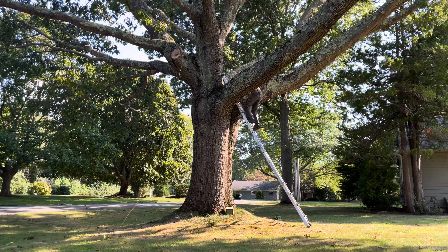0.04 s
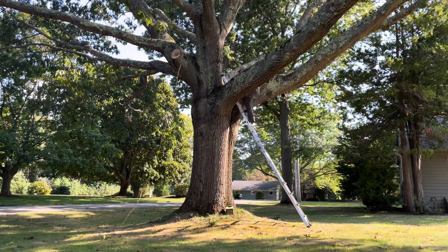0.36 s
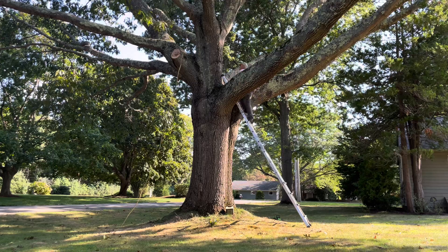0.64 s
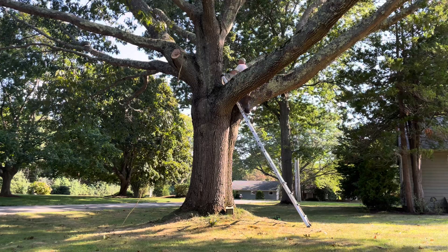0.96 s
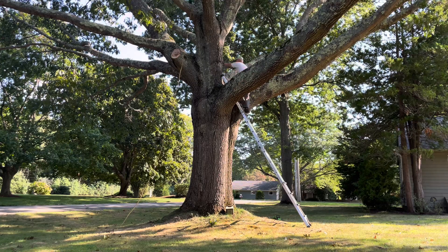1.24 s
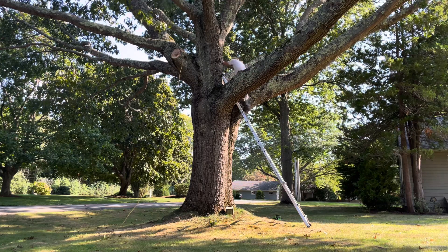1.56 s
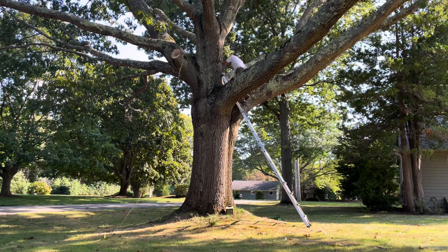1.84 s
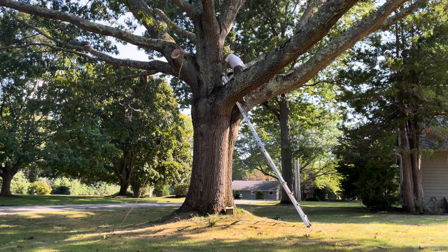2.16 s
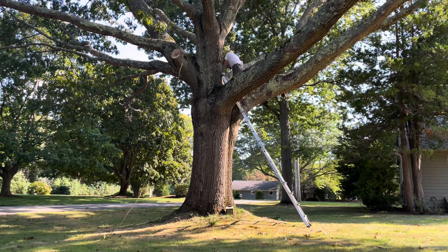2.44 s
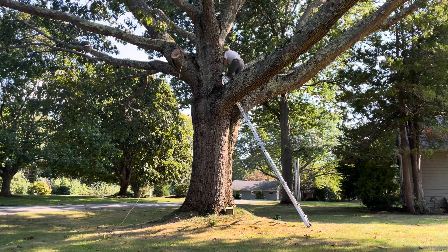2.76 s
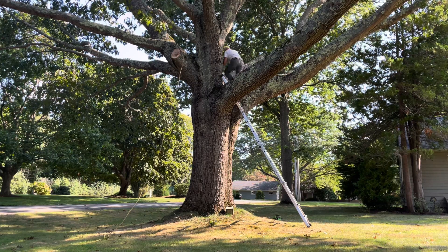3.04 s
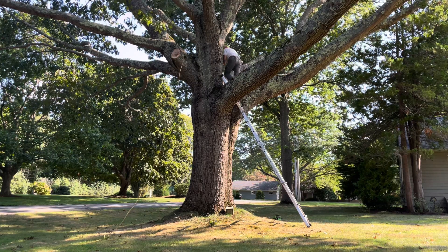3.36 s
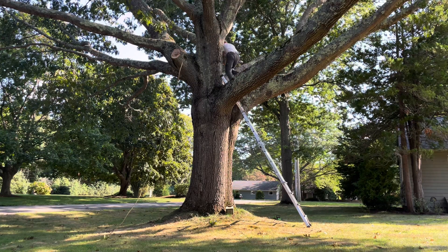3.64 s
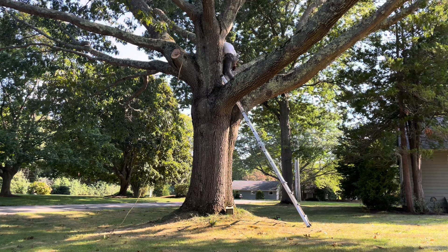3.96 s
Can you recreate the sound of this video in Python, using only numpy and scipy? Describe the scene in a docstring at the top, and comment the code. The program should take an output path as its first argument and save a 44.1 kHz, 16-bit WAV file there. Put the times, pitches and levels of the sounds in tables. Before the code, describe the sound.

Sharp metal ladder clanks with boot knocks on wood, over a faint ticking insect outdoors.

```python
"""Climbing from a ladder into a tree

Some way across a garden, someone climbs off the top of an aluminium ladder into a big tree. Rungs, rails
and loose gear clank and ring, boots knock and scuff on wood; a faint echo and a bright sizzle follow.
An insect ticks with its wings over a low outdoor rumble. Near the end, wind buffets the microphone."""
import sys
import numpy as np
from scipy import signal
from scipy.fft import rfft, irfft
from scipy.io import wavfile
from scipy.ndimage import uniform_filter1d

SR = 44100
rng = np.random.default_rng(int(sys.argv[2]) if len(sys.argv) > 2 else 0)


def wav_record(signal):
    """Record a signal, one row per channel, as 16-bit PCM in the file named by sys.argv[1]."""
    frames = np.transpose(np.atleast_2d(signal))
    bounded = np.clip(frames, -1, 1)
    # unit amplitude maps onto the largest positive 16-bit level
    quanta = np.round(bounded * 32767).astype(np.int16)
    wavfile.write(sys.argv[1], SR, quanta)


N = 4 * SR


def amp(db):
    """Decibels to gain."""
    return 10 ** (np.asarray(db) / 20)


def unit_rms(x):
    """Scales to rms 1."""
    return x / np.sqrt(np.mean(x ** 2) + 1e-20)


def curve(points, hz):
    """Reads a table on a log-frequency axis."""
    freq_hz, value = np.transpose(points)
    return np.interp(np.log(hz + 1), np.log(freq_hz + 1), value)


def add(mix, start_s, sound):
    """Drops a sound into the mix at start_s."""
    part = mix[..., max(round(start_s * SR), 0):][..., :sound.shape[-1]]
    part += sound[..., :part.shape[-1]]


def noise_pair(colour_db, size):
    """Two unrelated noises of rms 1; colour_db gives the relative level at each frequency."""
    colour = amp(colour_db(np.fft.rfftfreq(size, 1 / SR)))
    return unit_rms(irfft(rfft(rng.standard_normal((2, size))) * colour, size))


def wobble(size, smooth_samples):
    """Smoothed random movement of rms 1."""
    return unit_rms(uniform_filter1d(rng.standard_normal(size), size=smooth_samples))


def blend(left, other, likeness):
    """Makes a right channel: likeness 1 copies left, 0 gives only the other signal."""
    return likeness * left + np.sqrt(1 - likeness ** 2) * other


def burst(t, attack_s, decay_s):
    """Linear attack, exponential decay."""
    return np.minimum(t / attack_s, 1) * np.exp(-np.maximum(t - attack_s, 0) / decay_s)


def damped_hit(level_db, pitch_hz, decay_s, attack_s, width_octaves, skirt_db=-18):
    """A contact that does not ring: noise through one broad, quickly damped resonance."""
    def resonance_db(hz):
        octaves_off = np.log2((hz + 1) / pitch_hz)
        return skirt_db * np.log10(1 + (octaves_off / width_octaves) ** 4)

    t = np.arange(SR // 3) / SR
    envelope = burst(t, attack_s, decay_s)
    body = noise_pair(resonance_db, len(t)) * envelope
    return amp(level_db) * np.array([unit_rms(side) for side in body]) * np.sqrt(np.mean(envelope ** 2))


# Low outdoor rumble and soft hiss, with a separate thin band of high hiss: freq_hz, relative_db
BED_TONE = [(20, -38), (30, -20), (43, -5), (60, 1), (90, 2.5), (125, -4.5), (170, -15.5), (250, -20.5),
            (400, -25), (800, -22.5), (1500, -28.5), (3000, -35), (4200, -34.5), (5000, -31.5), (5800, -36),
            (6800, -23), (7800, -38), (9400, -67), (10700, -40.5), (12500, -38.5), (15500, -52)]
# Left-right likeness of bed and echo; the top hiss is nearly mono: freq_hz, likeness
STEREO_LIKENESS = [(30, 0.96), (130, 0.85), (300, 0.59), (1000, 0.074), (4000, 0.2), (7000, 0.13),
                   (11000, 0.83)]
# Lean of the bed: freq_hz, left_minus_right_db
BED_PAN = [(60, -4), (250, -1), (600, 0), (1200, -1), (2500, -1), (5000, 2.5), (12000, 0)]


def rumble_and_hiss(level_db=-56, drift_db=2, full_drift_hz=164):
    """A bed of low rumble and soft hiss, drifting in patches."""
    frames, hz = N // 256 + 5, np.fft.rfftfreq(2048, 1 / SR)
    real, imaginary = rng.standard_normal((2, 2, frames, len(hz))).swapaxes(0, 1)
    left, other = real + 1j * imaginary
    patches = uniform_filter1d(rng.standard_normal(left.shape), size=14, axis=0)
    patches = unit_rms(uniform_filter1d(patches, size=24, axis=1))
    depth_db = drift_db * np.minimum(hz / full_drift_hz, 1)  # the deep rumble stays steadier
    spectra = np.array([left, blend(left, other, curve(STEREO_LIKENESS, hz))])
    spectra *= amp(curve(BED_TONE, hz) + depth_db * patches)
    spectra *= amp(np.outer([.5, -.5], curve(BED_PAN, hz)))[:, None]
    _, bed = signal.istft(spectra.transpose(0, 2, 1), nperseg=2048, noverlap=1792)
    return amp(level_db) * unit_rms(bed[:, :N])


def insect(level_db=-63.5, pan_db=-2.5, uneven_db=2, rasp=0.15):
    """Steady ticking: wing strokes come in pairs, each a short, raspy, falling chirp."""
    pairs_per_s, pair_gap_s, stroke_s, jitter_s = 22.1, .016, .01408, .0009
    pitch_hz, scatter_hz, fall_hz_per_s = 6746, 50, 87500
    out = np.zeros((2, N))
    t = np.arange(0, stroke_s, 1 / SR) - stroke_s / 2
    for start_s in np.arange(0, N / SR, 1 / pairs_per_s):
        for lag_s in (0, pair_gap_s):
            late, loud, sharp, skew = rng.standard_normal(4)
            phase = 2 * np.pi * np.cumsum(pitch_hz + scatter_hz * sharp - fall_hz_per_s * t) / SR
            chirp = np.sin([phase, phase + .5 * skew])
            teeth = 1 + rasp * wobble(2048, 40)[:len(t)]
            envelope = amp(uneven_db * loud) * np.hanning(len(t))
            add(out, start_s + lag_s + jitter_s * late, envelope * teeth * chirp)
    return out * amp([[level_db + pan_db / 2], [level_db - pan_db / 2]])


# Ringing pitches of the ladder, by part; the top two add a high sizzle: pitch_hz, relative_db, t60_s
RING_PITCHES = { "rung": [(684, -2, .2), (1010, -14, .11), (1230, -13, .11), (1599, 3.5, .08),
                (1653, -2, .07), (2371, -14, .2), (2910, -6, .06), (3217, 0, .065), (4717, -3, .06),
                (4824, 0, .05), (6040, -3, .05), (6857, 2, .06), (7090, -2, .06), (7880, -1, .06),
                (8263, 5, .075), (8767, 1, .06), (11150, -5, .08), (12750, -3, .08)],
                "hook": [(682, -5.5, .17), (1595, 0, .09), (1913, 1, .1), (2056, -1, .1), (2362, -5, .09),
                (2750, -2, .07), (2908, -2, .07), (3164, 0, .08), (3343, -4, .06), (4503, 1, .07),
                (4870, -1, .07), (6121, 0, .08), (6900, -4, .1), (7919, -5, .11)], "rail": [(521, -17, .6),
                (700, -12, .15), (1300, -6, .1), (1761, -7, .19), (2371, -13.5, .55), (3140, -4.5, .11),
                (3980, -1.5, .07), (4990, -3, .07), (6150, -4, .09)]}


def ladder_ring(t, part, tilt_db, load_detune=.004, twin_gain=.52, flutter_db=2):
    """The struck part rings unevenly: each tone beats against a weaker twin close by."""
    ring = 0
    for pitch_hz, level_db, t60_s in RING_PITCHES[part]:
        pitch_hz *= 1 + load_detune * rng.standard_normal()  # shifting weight bends the pitch
        spread_hz = 17.2 * np.sqrt(pitch_hz / 1000)
        twin_hz = pitch_hz + spread_hz * rng.standard_normal()
        phase_turns = rng.random((2, 1))
        tone = np.sin(2 * np.pi * (pitch_hz * t + phase_turns))
        twin = twin_gain * np.cos(2 * np.pi * (twin_hz * t + phase_turns))
        level_db += tilt_db * np.log2(pitch_hz / 2000)
        envelope = amp(level_db + flutter_db * wobble(len(t), 400) - 60 * t / t60_s)
        ring += envelope * (tone + twin)
    return ring


# Tone of the dense clatter under the ring: freq_hz, relative_db
CLATTER_TONE = [(100, -28.5), (400, -16.5), (550, -17.5), (720, -14), (1050, -9.5), (1380, -11.5),
                (1620, -3), (2000, -4), (2550, -5), (3200, -2.5), (3800, -6.5), (4400, -4), (4850, 4),
                (5700, -4.5), (6300, 0.5), (7200, 3), (8500, 7), (9600, 0), (11200, -1.5), (13000, -.5),
                (15500, -12)]
# Hits on the ladder: start_s, level_db, clatter_tilt_db_per_octave, attack_s, decay_s,
# ring_trim_db, ring_tilt_db_per_octave, part
LADDER_HITS = [ (.000, -50, -5.5, 0.00091, 0.03, -2, -0.5, "hook"),
               (.025, -49, -3, 0.00082, 0.0083, -8.5, 3, "hook"),
               (0.0719, -46, -5, 0.00051, 0.015, -0.5, 3, "hook"),
               (0.117, -47.5, -3, 0.0015, 0.0091, -7.5, -5, "hook"),
               (0.297, -61.5, -4, .00072, 0.0032, -6, 2, "hook"),
               (0.5184, -46, -2.5, 0.0019, 0.0091, -5, -0.5, "hook"),
               (.529, -47, -8.5, 0.0018, .005, -13.5, 7, "hook"),
               (0.5849, -46, -1, 0.0017, 0.0046, -16, 1, "hook"),
               (0.687, -52.5, -5, 0.0091, 0.041, -6.5, 2.5, "hook"),
               (.694, -58, -9, 0.0035, 0.0059, 5, 1, "rung"),
               (.713, -48, -4.5, 0.0076, 0.0093, 6, -0.5, "rung"),
               (.7705, -60, 0, .0006, 0.0016, -8, 3, "rung"),
               (1.178, -46.5, -2, 0.0019, 0.011, -14, -5, "rung"),
               (1.253, -57, -4, 0.0009, 0.039, -14, 0, "hook"),
               (1.532, -57, -2.5, 0.0012, 0.0142, -5, 0, "rail"),
               (1.572, -56, -3.5, .003, .011, -16, -4, "rail"),
               (1.582, -56.5, -4, 0.00082, 0.0087, 6, 0, "rail"),
               (1.6495, -47.5, -3, .0038, 0.0066, 3.5, -0.5, "rail"),
               (1.9352, -38, -1.5, 0.0052, 0.0071, -1.5, 0, "rung"),
               (2.152, -60.5, -3, 0.0019, 0.013, -7, -10.5, "hook"),
               (2.2084, -43.5, -2.5, 0.0041, 0.01, -5.5, -0.5, "rung"),
               (2.389, -55, -2, 0.0018, 0.024, -10, 0, "rung"),
               (2.407, -54.5, -7, 0.00404, 0.03, -18, 0, "rung"),
               (2.431, -53.5, -11.5, .0052, 0.024, -4, 3.5, "rung"),
               (2.4405, -44.5, -2, 0.0017, 0.015, -7.5, 2.5, "rung"),
               (2.459, -49.5, -2, 0.0041, 0.013, -5, -4, "rung"),
               (3.193, -57, -5, .0028, 0.049, -4, 0.5, "rung"),
               (3.212, -51.5, -5.5, 0.014, 0.023, -1.5, 7, "hook"),
               (3.342, -57.5, -5, 0.0022, 0.024, -6, 3.5, "rung"),
               (3.362, -53.5, -2, 0.0054, 0.015, -4, -7, "rung"),
               (3.378, -51, -14, 0.0032, 0.0072, -5.5, -1, "rung"),
               (3.391, -42.5, -1.5, 0.0016, 0.018, -20, -10, "rung"),
               (3.397, -52.5, -7, 0.0039, 0.017, 2, -4.5, "hook"),
               (3.549, -59, -14, 0.0012, 0.012, -22, 0, "rung"),
               (3.960, -59.5, -20, 0.0019, 0.0095, -21, 3, "rung")]


def ladder_clanks(grit_db=1.0, ring_lag_s=.0007):
    """Metal chatters on metal and leaves the part ringing; each hit has its own ring brightness."""
    out, t = np.zeros((2, N)), np.arange(SR // 2) / SR
    for start_s, level_db, tilt_db, attack_s, decay_s, ring_trim_db, ring_tilt_db, part in LADDER_HITS:
        grit = amp(grit_db * wobble(len(t), 30))
        hiss = noise_pair(lambda hz: curve(CLATTER_TONE, hz) + tilt_db * np.log2(hz / 4000 + .16), len(t))
        clatter = unit_rms(hiss * grit) * burst(t, attack_s, decay_s)
        ring = .5 * amp(ring_trim_db) * ladder_ring(t, part, ring_tilt_db)
        ring_onset = np.minimum(t / (attack_s + ring_lag_s), 1)
        add(out, start_s, amp(level_db) * (clatter + ring * ring_onset))
    return out


# Share of the left channel fed to the right: freq_hz, likeness
CLIMB_LIKENESS = [(300, 1), (2000, 0.98), (5000, 0.84), (8000, 0.91), (12000, 1)]
# Lean of the climb: freq_hz, left_minus_right_db
CLIMB_PAN = [(200, 8), (650, -3), (1000, -6.5), (1900, -2.5), (3800, -2), (7500, 0.5), (12000, -0.5)]
# Phase between the microphone ports: freq_hz, left_lead_rad
CLIMB_PHASE = [(100, 0.66), (1000, 0.69), (3000, 0.42), (5000, 0.81), (7000, 1.13), (8500, 2.48),
               (10500, 2.36), (12500, 0.75), (15000, 0)]


def place_at_ladder(sound):
    """Sets a sound a little to the right, as two closely spaced microphone ports hear it."""
    hz = np.fft.rfftfreq(N, 1 / SR)
    left, other = rfft(sound)
    right = blend(left, other, curve(CLIMB_LIKENESS, hz))
    lean = amp(curve(CLIMB_PAN, hz) / 2) * np.exp(.5j * curve(CLIMB_PHASE, hz))
    return irfft(np.array([left * lean, right / lean]), N)


# Length of the echo and its sizzle: freq_hz, t60_s
TAIL_DECAY = [(200, 0.81), (800, 0.51), (3000, 0.68), (7000, 0.72), (14000, 0.29)]
# Tone of the echo and its sizzle: freq_hz, relative_db
TAIL_TONE = [(300, 7), (700, 2.5), (1600, -2), (3000, 1), (5000, 0), (8000, -9.5), (10500, 5), (14000, 4.5)]


def diffuse_echo(sound, level_db=-7, fade_in_s=.0019):
    """Diffuse echo, with a bright sizzle trailing each hit."""
    hz, t, (left, other) = signal.stft(rng.standard_normal((2, SR)), SR, nperseg=256)
    hz = hz[:, None]
    spectra = np.array([left, blend(left, other, curve(STEREO_LIKENESS, hz))])
    spectra *= amp(curve(TAIL_TONE, hz) - 60 * t / curve(TAIL_DECAY, hz))
    _, tail = signal.istft(spectra, SR, nperseg=256)
    tail *= np.minimum(np.arange(tail.shape[1]) / SR / fade_in_s, 1) ** 2
    return amp(level_db) * signal.fftconvolve(sound, tail / np.linalg.norm(tail[0]), axes=1)[:, :N]


def wall_slap(sound, level_db=-21, delay_s=.103, smear_s=.011):
    """A house wall throws back one late, smeared reflection."""
    t = np.arange(SR // 4) / SR
    taps = rng.standard_normal(len(t)) * np.exp(-.5 * ((t - delay_s) / smear_s) ** 2)
    return amp(level_db) * signal.fftconvolve(sound, taps[None] / np.linalg.norm(taps), axes=1)[:, :N]


# Dull knocks of the climb: start_s, level_db, pitch_hz, decay_s
DULL_KNOCKS = [(.4825, -53.5, 710, 0.0096), (.495, -56.5, 680, .0095), (.724, -62.5, 730, 0.02),
               (1.181, -54.5, 1550, 0.021), (1.2274, -45, 760, 0.0048), (1.252, -57, 675, 0.0055),
               (3.379, -48, 686, .0047), (3.396, -72, 1950, 0.0048), (3.405, -58, 1040, 0.03)]


def dull_knocks():
    """Short, dull, quickly damped knocks."""
    out = np.zeros((2, N))
    for start_s, *knock in DULL_KNOCKS:
        add(out, start_s, damped_hit(*knock, attack_s=.0014, width_octaves=.25))
    return out


# Small, bright clicks: start_s, level_db, pitch_hz, decay_s
BUCKLE_CLICKS = [(0.7714, -38.5, 8400, 0.0008), (3.847, -51.5, 9400, 0.0008)]


def buckle_clicks():
    """A buckle makes tiny, hard contacts with a sharp attack."""
    out = np.zeros((2, N))
    for start_s, *click in BUCKLE_CLICKS:
        add(out, start_s, damped_hit(*click, attack_s=.00017, width_octaves=.3))
    return out


# Soft, low thuds: start_s, level_db, pitch_hz, decay_s, attack_s
LIMB_THUDS = [(1.236, -62, 185, 0.066, 0.011), (2.478, -50.5, 100, 0.011, 0.011)]


def limb_thuds():
    """Weight lands on the tree limb with a soft thud, in mono."""
    out = np.zeros(N)
    for start_s, *thud in LIMB_THUDS:
        add(out, start_s, damped_hit(*thud, width_octaves=.66)[0])
    return out


# Short midrange scrapes: start_s, level_db, pitch_hz, decay_s, attack_s
BARK_SCUFFS = [(1.319, -58, 1760, 0.013, 0.017), (1.352, -64, 1670, 0.019, 0.013),
               (3.372, -50.5, 1430, .01, 0.014)]


def bark_scuffs():
    """Soles drag over bark in brief swells of friction noise."""
    out = np.zeros((2, N))
    for start_s, *scuff in BARK_SCUFFS:
        add(out, start_s, damped_hit(*scuff, width_octaves=.66))
    return out


# Wind thumps: centre_s, level_db, half_width_s, pitch_hz
WIND_BUFFETS = [(2.88, -41.5, 0.0097, 84), (3.37, -31.5, 0.007, 61), (3.436, -41, 0.057, 81.5),
                (3.486, -26.5, 0.00505, 75), (3.523, -29.5, 0.013, 53), (3.569, -31, 0.011, 63),
                (3.621, -39, 0.051, 55.1), (3.673, -33.5, 0.0037, 86), (3.858, -25.5, 0.0075, 54),
                (3.875, -38, 0.0036, 156), (3.898, -39.5, 0.015, 73.5), (3.99, -48, 0.026, 63)]
# Tone of their turbulence: freq_hz, relative_db
TURBULENCE_TONE = [(20, -18), (35, -20), (55, 11.5), (80, 11), (115, 4), (160, -18), (240, -24),
                   (400, -47.5), (900, -71), (3000, -90)]


def wind_buffets(stereo_width=.33, churn=.67):
    """Eddies push on the microphone: short, deep swings of pressure with some turbulence."""
    out, t = np.zeros((2, N)), np.arange(SR // 4) / SR - 1 / 8
    for centre_s, level_db, half_width_s, pitch_hz in WIND_BUFFETS:
        envelope = np.exp(-.5 * (t / half_width_s) ** 2)
        turbulence, side = noise_pair(lambda hz: curve(TURBULENCE_TONE, hz), len(t)) * envelope
        swing = envelope * np.sin(2 * np.pi * (pitch_hz * t + rng.random()))
        mid = unit_rms(swing) + churn * unit_rms(turbulence)
        thump = np.array([unit_rms(mid + sign * stereo_width * unit_rms(side)) for sign in (1, -1)])
        add(out, centre_s + t[0], amp(level_db) * thump * np.sqrt(np.mean(envelope ** 2)))
    return out


def scene():
    """Clanks, knocks and scuffs feed the echoes; thuds, buckle, insect, bed and wind stay dry."""
    climb = ladder_clanks() + dull_knocks() + bark_scuffs()
    thuds, buckle = limb_thuds(), buckle_clicks()
    placed = place_at_ladder(climb + wall_slap(climb) + buckle)
    echo = diffuse_echo(place_at_ladder(climb))
    return placed + echo + thuds + insect() + rumble_and_hiss() + wind_buffets()


def record(dry, low_cut_hz=27, high_cut_hz=15900):
    """A gentle low cut and a steep high cut trim the mix."""
    low_cut = signal.butter(2, low_cut_hz, "highpass", fs=SR, output="sos")
    high_cut = signal.firwin(511, high_cut_hz, window=("kaiser", 9), fs=SR)
    return signal.oaconvolve(signal.sosfiltfilt(low_cut, dry), high_cut[None], "same")


dry = scene()
out = record(dry)
wav_record(out)
```